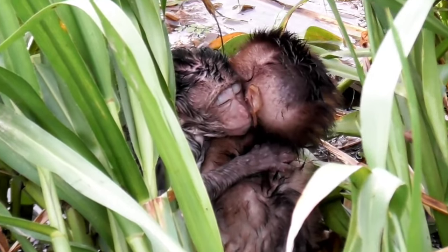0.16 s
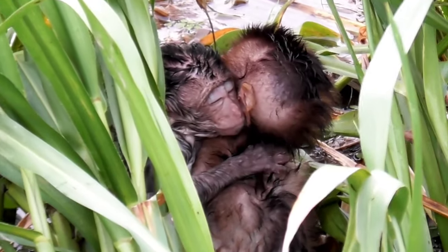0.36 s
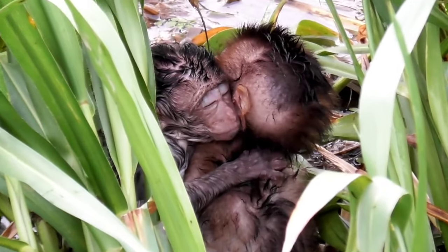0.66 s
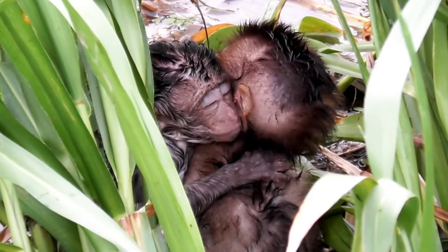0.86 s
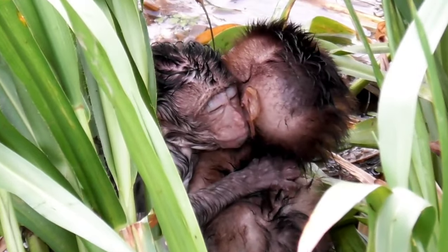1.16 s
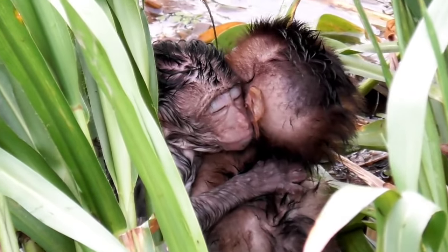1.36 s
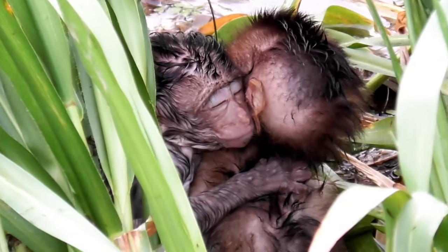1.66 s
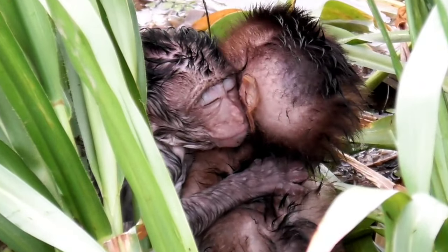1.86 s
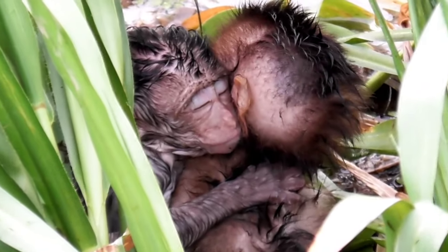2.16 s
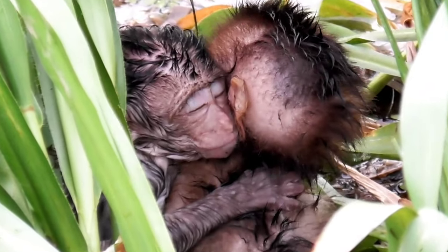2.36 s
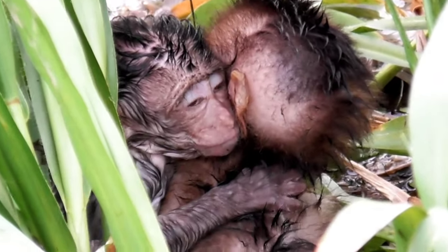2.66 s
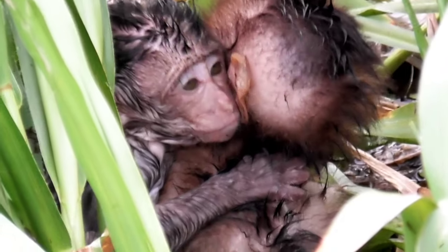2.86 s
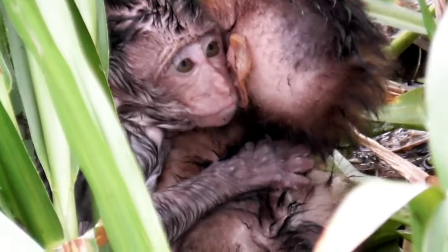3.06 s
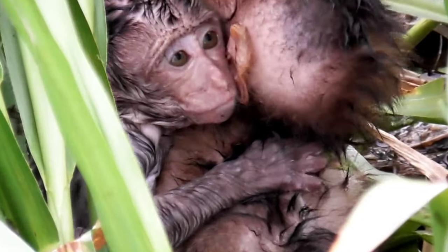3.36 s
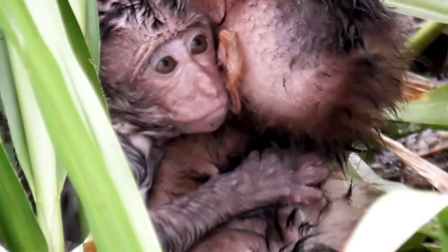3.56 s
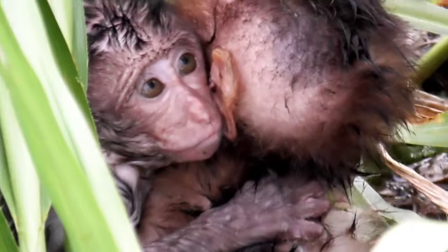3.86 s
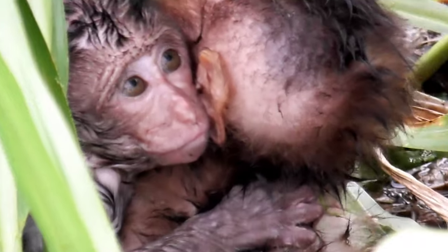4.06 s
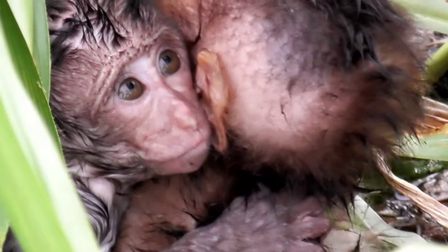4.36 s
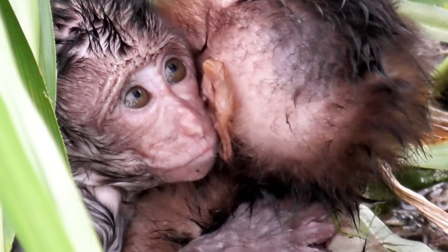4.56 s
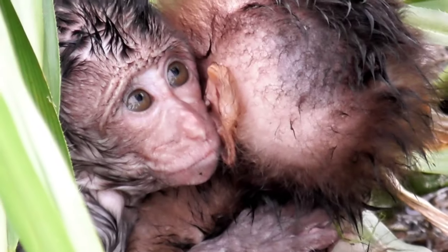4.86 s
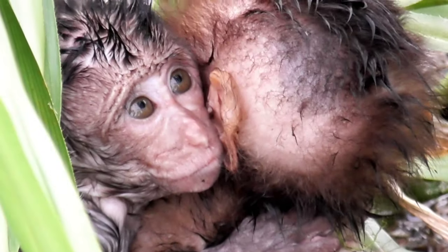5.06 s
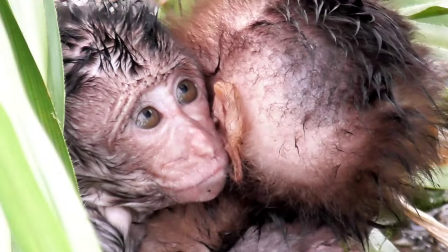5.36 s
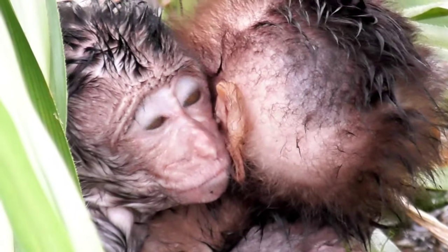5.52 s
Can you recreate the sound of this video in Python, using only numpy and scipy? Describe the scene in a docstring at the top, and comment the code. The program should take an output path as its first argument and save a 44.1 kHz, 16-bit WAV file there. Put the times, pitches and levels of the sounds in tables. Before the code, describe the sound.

Soft, short rising and falling coos from a baby monkey in tall grass, with distant birds, a cricket and low rumble.

```python
"""A baby monkey coos close by in tall grass: short rising and falling calls, then one long held coo.
Each is a nearly pure tone with weak overtones shaped by throat and mouth. Farther off, small birds
warble, chip and whistle in gliding tones; a cricket and other insects pulse in the treble with wing rasp.
Soft pops and leaf ticks ring from the nest, and a grass blade rustles once.
Under everything lie a low rumble and roar, a far wash, a fading drone and a thin hiss."""
import sys
import numpy as np
from scipy import signal
from scipy.fft import rfft, irfft, next_fast_len
from scipy.io import wavfile
from scipy.ndimage import uniform_filter1d

SR = 44100
rng = np.random.default_rng(int(sys.argv[2]) if len(sys.argv) > 2 else 0)


def dump(signal):
    """Clip the signal to [-1, 1] and save it as 16-bit WAV at the path in sys.argv[1]."""
    limited = np.clip(np.atleast_2d(signal).T, -1, 1)
    pcm = np.round(limited * 32767).astype(np.int16)
    wavfile.write(sys.argv[1], SR, pcm)


N = 250929

# short coos, one arch each: top_s, half_width_s, top_hz, fundamental_db, overtones_db, tilt_db_per_order
COOS = [(.005, .034, 1171, -48, -69, 1), (.286, .033, 976, -52, -58, -4),
        (0.379, 0.046, 1055, -54.5, -64.5, -3), (.82, .031, 1020, -58, -63, -1),
        (.955, .042, 1097, -48, -66.5, -1), (1.048, 0.036, 1121, -49, -69, -5),
        (1.397, 0.031, 967, -58, -65.5, -1.5), (1.51, 0.023, 1077, -51.5, -67, -2),
        (1.626, 0.021, 1120, -51, -72, -7), (2.13, 0.026, 1024, -60.5, -73, -3),
        (2.242, 0.037, 1146, -50, -68, 1), (2.34, .031, 1129, -50, -72, -3)]
# long coo, climbing then held: time_s, pitch_hz, fundamental_db, overtones_db
LONG_COO = [(5.3, 906, -64, -84), (5.335, 985, -54.5, -62.5), (5.39, 1012, -60, -74),
            (5.455, 1080, -47, -66), (5.69, 1112, -51.5, -69)]
# throat and mouth response, for short coos and held open: freq_hz, gain_db
THROAT = [(1700, 13), (1950, 2.5), (2200, -3), (2600, 0), (3020, -1), (3300, -3), (3900, -6), (4300, -8.5),
          (4600, -12), (5200, -25)]
OPEN_THROAT = [(1800, 8), (2200, 0.5), (2700, -14), (3030, -20), (3230, 2), (3600, -4), (4000, 0),
               (4400, -0.5), (5000, -24)]

# swooping bird notes: turn_s, half_length_s, turn_hz, bend_to_ends_hz, level_db
WARBLES = [(1.009, .018, 2380, 385, -61), (1.405, .02, 2390, 400, -61), (1.451, .02, 2340, 400, -61.5),
           (1.723, .018, 2360, 350, -60.5), (1.768, .02, 2326, 352, -60.5), (1.994, .032, 1990, 280, -66),
           (2.105, .032, 2144, 318, -64.5), (2.412, .025, 2510, -400, -64.5), (2.465, .028, 2254, 378, -62),
           (2.793, .048, 3190, -650, -72), (2.932, .05, 3140, -850, -66.5), (3.302, .02, 2447, 400, -65),
           (3.346, .038, 3090, -750, -71)]
# second bird's chips: start_s, gain_db
CHIPS = [(.425, -67.5), (.565, -68.5), (.69, -70), (.99, -72), (1.14, -65), (1.294, -63), (1.44, -64),
         (1.598, -62), (1.772, -60), (1.928, -62), (2.05, -66), (2.117, -61.5), (2.271, -61.5),
         (2.464, -65), (2.641, -62), (2.848, -61.5), (3.044, -67.5), (3.272, -61.5), (3.508, -63),
         (3.722, -64), (3.936, -64.5), (4.137, -64), (4.383, -63), (4.599, -63)]
# arch of one chip: time_s, pitch_hz, gain_db
CHIP_SHAPE = [(0, 2513, 0), (.006, 2732, 3), (.015, 2723, -1.5), (.023, 2586, 5.5), (.03, 2510, 0.5),
              (.037, 2430, -15)]
# distant bird's whistles: start_s, length_s, start_hz, gain_db
WHISTLES = [(0.068, .042, 1630, -72), (0.172, 0.074, 1293, -70), (2.574, 0.068, 1270, -71),
            (2.758, .09, 1306, -74), (2.996, 0.098, 1170, -72), (3.11, .09, 1410, -72),
            (3.404, .11, 1200, -76), (3.623, 0.11, 1370, -72.5), (3.877, 0.13, 1265, -74),
            (4.006, 0.069, 1567, -71), (4.322, 0.085, 1370, -73), (4.411, 0.067, 1547, -71.5),
            (4.802, 0.057, 1675, -73)]

# soft wet pops, perhaps of the lips: start_s, pitch_hz, level_db, t60_s, pan_db
POPS = [(.652, 692, -50, 0.25, 1), (4.567, 784, -42.5, 0.051, 2), (4.749, 830, -36, 0.019, -4.5)]
# dry leaf ticks: start_s, peak_db, pan_db
TICKS = [(.052, -48, 1), (2.044, -52.5, 1.5), (2.84, -58, 0), (4.087, -48, .5), (4.566, -52, 0),
         (4.749, -43.5, -6), (4.864, -54, 0), (5.626, -47.5, -2)]
# leaf resonances: freq_hz, gain_db, t60_s
LEAF_MODES = [(1610, -3, 0.0058), (2070, -0.5, 0.0056), (3470, -5, 0.0061), (4010, -5, 0.0061),
              (5540, -13, 0.006)]
# grass rustle spectrum: freq_hz, gain_db
GRASS_SPECTRUM = [(2500, -9), (4000, 10), (6500, 18), (9000, -12)]
# grass rustle envelope: time_s, level_db
GRASS_ENVELOPE = [(1.71, -100), (1.74, -68), (1.765, -76), (1.8, -100)]

# insect rasp spectra: freq_hz, gain_db
CRICKET_SPECTRUM = [(7250, -30), (7480, -12), (7555, -2), (7680, -8), (7745, -11), (7795, 0), (7860, -13),
                    (8050, -30)]
THROBBER_SPECTRUM = [(6300, -20), (6700, -10), (6900, 3.5), (7060, -3), (7250, -8), (7500, -43)]
CHORUS_SPECTRUM = [(7900, -31), (8500, -13), (8750, -12), (9000, -4), (9450, 0), (9750, -5), (10150, -19.5),
                   (11000, -35)]
BUZZ_SPECTRUM = [(3000, -24), (3400, -5), (3650, 0), (3850, -5.5), (4200, -10)]
LATE_INSECT_SPECTRUM = [(8050, -18), (8350, -19), (8500, -1), (8650, -2), (8850, -6), (9100, -22)]
HIGH_INSECT_SPECTRUM = [(10000, -9), (11000, -3), (12500, -7), (15500, 2)]
# insect envelopes: time_s, gain_db
CRICKET_ENVELOPE = [(0, -56.5), (2.7, -57), (5.2, -53), (5.69, -55)]
CHORUS_ENVELOPE = [(0, -64.5), (1, -63.5), (1.6, -66), (2.8, -66), (4.2, -62.5), (5.69, -64)]
BUZZ_ENVELOPE = [(3.38, -100), (3.45, -76), (3.55, -70), (3.8, -69), (4.05, -70.5), (4.14, -100)]

# background spectra: freq_hz, gain_db
RUMBLE_SPECTRUM = [(12, -28), (25, -23), (40, -13), (62, -3.5), (88, 0), (118, -1.5), (160, -12),
                   (230, -32.5)]
ROAR_SPECTRUM = [(90, -16.5), (130, -2), (165, 0), (250, -6.5), (320, -16), (420, -23.5), (600, -44),
                 (1000, -59)]
WASH_SPECTRUM = [(150, 2), (300, 6.5), (480, 2), (730, 2.5), (950, -4), (1200, -7), (1390, -2), (1550, -8),
                 (1900, -6), (2500, -14), (4200, -19), (5500, -24.5)]
DRONE_SPECTRUM = [(520, -12), (660, -5), (750, -1.5), (830, -11.5), (980, -10.5)]
HISS_SPECTRUM = [(2000, -11), (5200, -4), (6500, 3), (8200, 5), (10500, 7), (12500, 4.5), (15500, 1.5)]
# background envelopes: time_s, level_db
RUMBLE_ENVELOPE = [(0, -35.5), (.12, -32), (.6, -35), (1.5, -36.3), (2.1, -34), (3.1, -37), (4.2, -36.5),
                   (5.69, -39)]
ROAR_ENVELOPE = [(0, -42.5), (.7, -42), (1.65, -42), (1.85, -43.3), (3.25, -40.5), (4.1, -42),
                 (5.69, -41.5)]
WASH_ENVELOPE = [(0, -57), (1, -58), (2, -58), (3, -57.5), (4, -59), (5.69, -59)]
DRONE_ENVELOPE = [(0, -62.5), (.3, -65.5), (1.2, -63), (2.0, -63.5), (2.6, -86), (5.69, -82)]
# left-right likeness of the surroundings: freq_hz, correlation
AMBIENT_CORRELATION = [(10, 0.77), (130, 0.97), (220, 0.91), (330, 0.54), (520, 0), (800, 0.52),
                       (1300, 0.72), (3000, 1), (6000, 1), (9000, 0.15), (16000, 0.07)]


def monkey():
    """Coos, close, left of centre and almost dry."""
    return pan(foliage(short_coos() + long_coo(), wet_db=-20, t60_s=.25), left_db=3.5)


def short_coos(sag_share=.115, fundamental_fall_db=11, overtone_fall_db=2):
    """Pitch and loudness rise and fall together in each arch; close arches slur into one call."""
    top_s, half_s, top_hz, fundamental_db, overtones_db, tilt_db = np.transpose(COOS)[:, :, None]
    away = np.minimum(((clock() - top_s) / half_s) ** 2, 20)
    arch = np.exp(-away)
    lead = arch ** 2 / np.sum(arch ** 2, axis=0)   # the nearest arch steers the voice
    hz = np.sum(lead * top_hz * (1 - sag_share * (1 - arch)), axis=0)
    fundamental = from_db(fundamental_db - fundamental_fall_db * away).max(axis=0)
    overtones = from_db(overtones_db - overtone_fall_db * away ** 2).max(axis=0)
    return voice(hz, fundamental, overtones, THROAT, np.sum(lead * tilt_db, axis=0))


def long_coo(quaver_hz=10.4, quaver_share=.0084):
    """The mouth stays open and the held pitch quavers slightly."""
    out = np.zeros(N)
    hz, fundamental, overtones = note(LONG_COO, fade_s=.006)
    quaver = 1 - quaver_share * np.cos(2 * np.pi * quaver_hz * np.arange(len(hz)) / SR)
    add(out, LONG_COO[0][0], voice(hz * quaver, fundamental, overtones, OPEN_THROAT, tilt_db=.5))
    return out


def voice(hz, fundamental, overtones, throat, tilt_db, shimmer_db=1.34):
    """A nearly pure tone; throat resonances divide the overtone power among harmonics 2-5."""
    hz = waver(hz, share=.004)
    orders = np.arange(2, 6)
    gains = np.array([from_db(at_hz(throat, k * hz) + tilt_db * k) for k in orders])
    upper = sum(gain * tone(k * hz) for k, gain in zip(orders, gains)) / np.linalg.norm(gains, axis=0)
    shimmer = from_db(shimmer_db * drift(rate_hz=60)[:len(hz)])
    return shimmer * (fundamental * tone(hz) + overtones * upper)


def warbling_bird(end_fall_db=6):
    """Clear notes swoop to a turn and back, loudest at the turn."""
    out = np.zeros(N)
    u = np.linspace(-1, 1, 21)
    for turn_s, half_s, turn_hz, bend_hz, db in WARBLES:
        contour = [turn_s + half_s * u, turn_hz + bend_hz * u ** 2, db - end_fall_db * u ** 2]
        hz, gain = note(np.transpose(contour))
        add(out, turn_s - half_s, gain * tone(waver(hz, share=.016)))
    return foliage(out, wet_db=-5.5, t60_s=.2)


def chipping_bird(trim_db=-3, trill_hz=137.6, trill_share=.031, detune_share=.0148):
    """One short arch repeated, never quite on one pitch, made hoarse by a very fast trill."""
    out = np.zeros(N)
    hz, gain = note(CHIP_SHAPE)
    for start_s, db in CHIPS:
        trill = np.sin(2 * np.pi * (trill_hz * np.arange(len(hz)) / SR + rng.random()))
        pitch_hz = hz * (1 + detune_share * rng.standard_normal() + trill_share * trill)
        add(out, start_s, from_db(db + trim_db) * gain * tone(waver(pitch_hz, share=.027)))
    return foliage(out, wet_db=-5, t60_s=.15)


def whistling_bird(trim_db=3.5, rise_hz_per_s=4200):
    """Upward slurs at one rate of climb, blurred by distance."""
    out = np.zeros(N)
    for start_s, length_s, start_hz, db in WHISTLES:
        end_hz = start_hz + rise_hz_per_s * length_s
        hz, gain = note([(start_s, start_hz, db), (start_s + length_s, end_hz, db)], fade_s=.0037)
        add(out, start_s, gain * tone(waver(hz, share=.0045)))
    return foliage(from_db(trim_db) * out, wet_db=-2, t60_s=.1)


def pops_and_ticks(crackle_decay_s=.0059):
    """A pop rings one small cavity; a tick is a brief crackle into a leaf's modes."""
    out, t = np.zeros((2, N)), np.arange(SR // 8) / SR
    impulse = 1.0 * (t == 0)
    for start_s, hz, db, t60_s, pan_db in POPS:
        add(out, start_s, pan(from_db(db) * ring(impulse, hz, t60_s), pan_db))
    for start_s, peak_db, pan_db in TICKS:
        crackle = rng.standard_normal(len(t)) * np.exp(-t / crackle_decay_s)
        tick = sum(from_db(db) * ring(crackle, hz, t60_s) for hz, db, t60_s in LEAF_MODES)
        add(out, start_s, pan(from_db(peak_db) * tick / np.abs(tick).max(), pan_db))
    return out


def grass(grain_db=6.4):
    """One blade brushes past another: a brief grainy rustle."""
    grain = from_db(grain_db * drift(rate_hz=200))
    return envelope(GRASS_ENVELOPE) * grain * noise(GRASS_SPECTRUM, correlation=1)


def cricket(wing_hz=7627, wander_hz=10, flutter_db=1.66, rasp_db=-6.5, echo_db=-59.5, diffuse_db=-65.5):
    """Each wing stroke gates a raspy tone; an echo and a diffuse ring fill the gaps."""
    direct = envelope(CRICKET_ENVELOPE) * wing_strokes(delay_s=0, half_s=.013)
    echo = from_db(echo_db) * wing_strokes(delay_s=.022, half_s=.015)
    swell = np.sqrt(direct ** 2 + echo ** 2 + from_db(diffuse_db) ** 2)   # arrivals add in power
    wing = tone(wing_hz + wander_hz * drift(rate_hz=40))
    flutter = from_db(flutter_db * drift(rate_hz=91))
    rasp = from_db(rasp_db) * noise(CRICKET_SPECTRUM, correlation=.52)
    return pan(swell * (wing * flutter + rasp), left_db=1.5)


def wing_strokes(delay_s, half_s, rate_hz=15.5, first_peak_s=.0355):
    """Flat-topped gain pulses, one per stroke."""
    cycles = (clock() - first_peak_s - delay_s) * rate_hz
    from_peak_s = ((cycles + .5) % 1 - .5) / rate_hz
    return np.exp(-(from_peak_s / half_s) ** 6)


def far_insects(throb_db=-69.5, throb_hz=12.8, chorus_trim_db=4, swell_hz=8.5):
    """Two bands of wing rasp, a throbbing insect and a hissing chorus, each at its own pulse rate."""
    rad_per_hz = 2 * np.pi * clock()
    throbs = 1 + .41 * np.cos(throb_hz * rad_per_hz + 1.4 + .37 * drift(rate_hz=1))
    throbber = from_db(throb_db) * throbs * noise(THROBBER_SPECTRUM, correlation=1)
    swells = 1 + .18 * np.cos(swell_hz * rad_per_hz + drift(rate_hz=1))
    chorus = envelope(CHORUS_ENVELOPE) * swells * noise(CHORUS_SPECTRUM, correlation=-.076)
    return pan(throbber + from_db(chorus_trim_db) * chorus, left_db=.4)


def buzzing_insect(flutter_db=1.9):
    """One short, fluttering buzz of wing rasp."""
    flutter = from_db(flutter_db * drift(rate_hz=200))
    return envelope(BUZZ_ENVELOPE) * flutter * noise(BUZZ_SPECTRUM, correlation=.99)


def late_insect(level_db=-68.5, start_s=3.55, rise_s=.3, pulse_hz=8.8, peak_s=3.885, depth=.73):
    """A shrill pulsing band that joins partway through."""
    fade_in = np.clip((clock() - start_s) / rise_s, 0, 1)
    pulses = 1 + depth * np.cos(2 * np.pi * pulse_hz * (clock() - peak_s))
    return from_db(level_db) * fade_in * pulses * noise(LATE_INSECT_SPECTRUM, correlation=.05)


def high_insect(level_db=-72.5, dip_db=7, period_s=.675, peak_s=.05):
    """A very high band that swells and sinks on the right."""
    dips = np.abs(np.sin(np.pi * (clock() - peak_s) / period_s))
    return pan(from_db(level_db - dip_db * dips) * noise(HIGH_INSECT_SPECTRUM), left_db=-5)


def background(hiss_db=-68):
    """Rumble and roar from the right, a wide far wash, a fading drone and a thin hiss."""
    rumble = envelope(RUMBLE_ENVELOPE) * noise(RUMBLE_SPECTRUM)
    roar = envelope(ROAR_ENVELOPE) * noise(ROAR_SPECTRUM)
    wash = envelope(WASH_ENVELOPE) * noise(WASH_SPECTRUM)
    drone = envelope(DRONE_ENVELOPE) * noise(DRONE_SPECTRUM)
    hiss = from_db(hiss_db) * noise(HISS_SPECTRUM)
    return pan(rumble, left_db=-4) + pan(roar, left_db=-2.5) + wash + drone + hiss


def foliage(x, wet_db, t60_s, predelay_s=.003):
    """Leaves and trunks scatter a short tail, mostly alike at both ears."""
    t = np.arange(SR // 2) / SR
    mid, side = rng.standard_normal((2, len(t))) * from_db(-60 * t / t60_s) * (t > predelay_s)
    echoes = mid + .22 * side * [[1], [-1]]
    echoes /= np.sqrt(np.sum(echoes ** 2) / 2)
    return x + from_db(wet_db) * signal.fftconvolve(x[None], echoes, axes=1)[:, :N]


def noise(spectrum, correlation=None):
    """Unit-rms stereo noise within the spectrum's span; ambient correlation by default."""
    size = next_fast_len(N)
    hz = np.fft.rfftfreq(size, 1 / SR)
    if correlation is None:
        correlation = at_hz(AMBIENT_CORRELATION, hz)
    in_band = (hz >= spectrum[0][0]) & (hz <= spectrum[-1][0])
    gain = from_db(np.where(in_band, at_hz(spectrum, hz), -100))
    mid, side = rfft(rng.standard_normal((2, size))) * gain
    stereo = np.sqrt(1 + correlation) * mid + np.sqrt(1 - correlation) * side * [[1], [-1]]
    return unit_rms(irfft(stereo, size)[:, :N])


def note(rows, fade_s=.0013):
    """Smoothed pitch and end-faded gains from rows of time_s, pitch_hz and levels in dB."""
    times_s, *columns = np.transpose(rows)
    t = np.arange(times_s[0], times_s[-1], 1 / SR)
    hz, *levels_db = [uniform_filter1d(np.interp(t, times_s, c), 300, mode="nearest") for c in columns]
    fade = np.clip(np.minimum(t - t[0], t[-1] - t) / fade_s, 0, 1)
    return [hz] + [from_db(db) * fade for db in levels_db]


def tone(hz):
    """Unit-rms sine following a pitch."""
    return np.sqrt(2) * np.sin(2 * np.pi * np.cumsum(hz) / SR)


def ring(push, hz, t60_s):
    """Resonator: a unit click starts a decaying sine of height 1."""
    r, w = from_db(-60 / (t60_s * SR)), 2 * np.pi * hz / SR
    return signal.lfilter([0, np.sin(w)], [1, -2 * r * np.cos(w), r * r], push + 1e-18)


def waver(hz, share):
    """Pitch with quick random jitter."""
    jitter = uniform_filter1d(rng.standard_normal(max(SR, len(hz))), size=100)
    return hz * (1 + share * unit_rms(jitter)[:len(hz)])


def drift(rate_hz):
    """Unit-rms random curve, low-passed at rate_hz."""
    hz = np.fft.rfftfreq(N, 1 / SR)
    return unit_rms(irfft(rfft(rng.standard_normal(N)) / (1 + (hz / rate_hz) ** 2), N))


def envelope(rows):
    """Gain per sample from rows of time_s, level_db."""
    return from_db(np.interp(clock(), *np.transpose(rows)))


def at_hz(rows, hz):
    """Interpolate over log frequency, ends held."""
    freq_hz, values = np.transpose(rows)
    return np.interp(np.log(hz + 1), np.log(freq_hz), values)


def add(out, start_s, sound):
    """Mix a sound in at start_s."""
    start = int(np.clip(start_s * SR, 0, N - 1))
    out[..., start:start + sound.shape[-1]] += sound[..., :N - start]


def pan(x, left_db):
    """Raise left over right by left_db."""
    return x * from_db([[left_db / 2], [-left_db / 2]])


def from_db(db):
    return 10 ** (np.asarray(db) / 20)


def unit_rms(x):
    return x / np.sqrt(np.mean(x ** 2) + 1e-20)


def clock():
    """Sample times in seconds."""
    return np.arange(N) / SR


def scene():
    """Everything heard from the edge of the grass."""
    birds = warbling_bird() + chipping_bird() + whistling_bird()
    nearby = monkey() + pops_and_ticks() + grass()
    insects = cricket() + far_insects() + buzzing_insect() + late_insect() + high_insect()
    return nearby + birds + insects + background()


def record(dry, cutoff_hz=15550):
    """Steep low-pass."""
    return signal.sosfilt(signal.ellip(12, .1, 90, cutoff_hz, fs=SR, output="sos"), dry)


dry = scene()
out = record(dry)
dump(out)
```